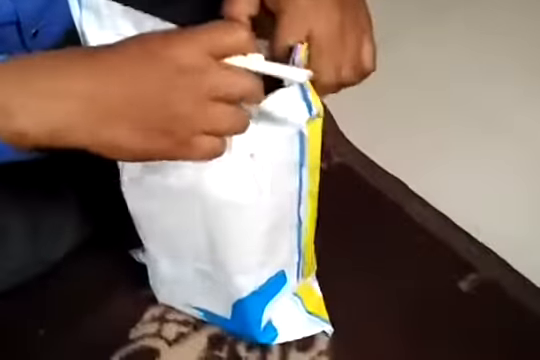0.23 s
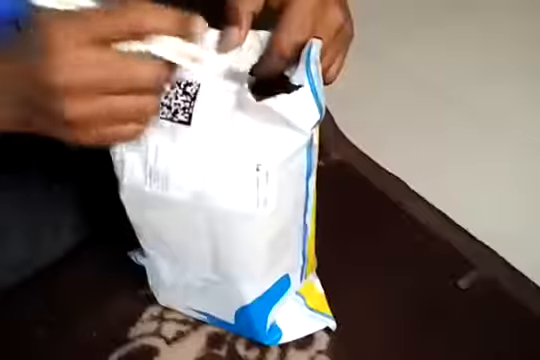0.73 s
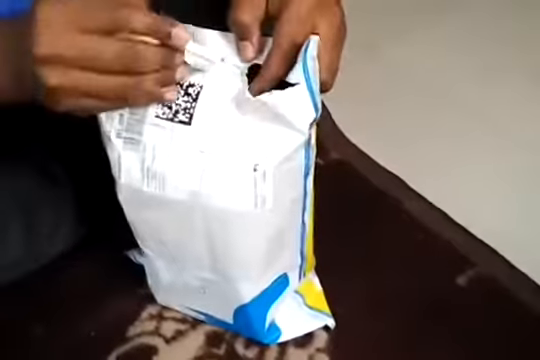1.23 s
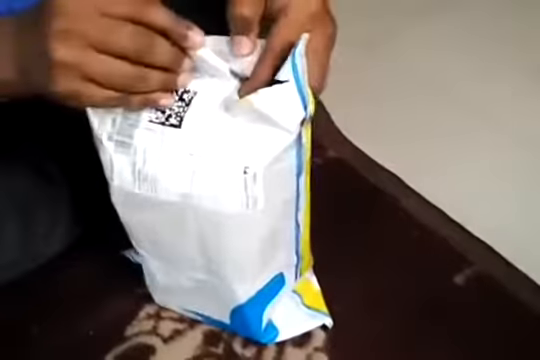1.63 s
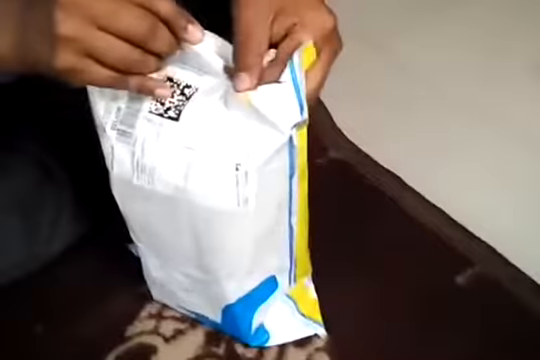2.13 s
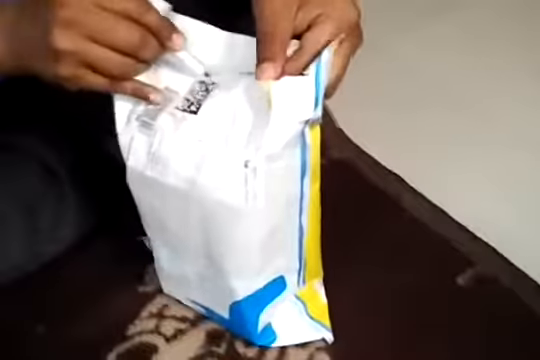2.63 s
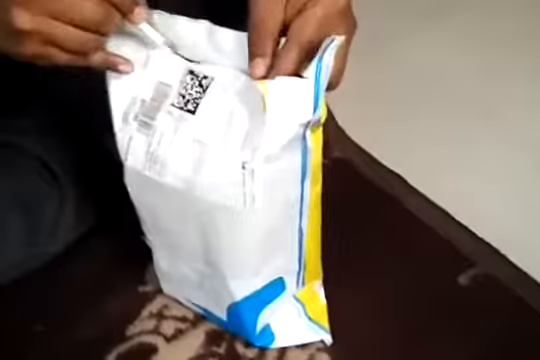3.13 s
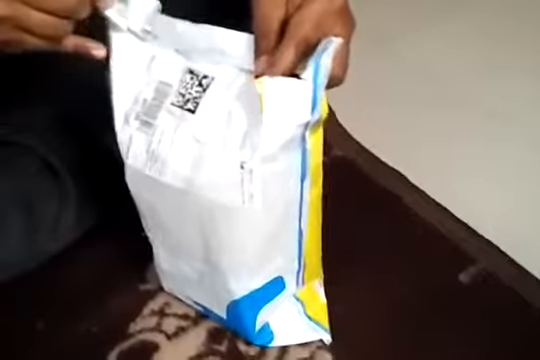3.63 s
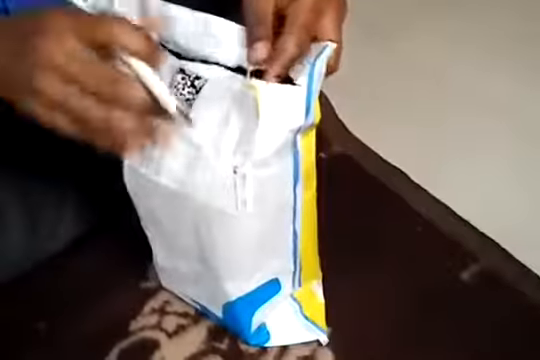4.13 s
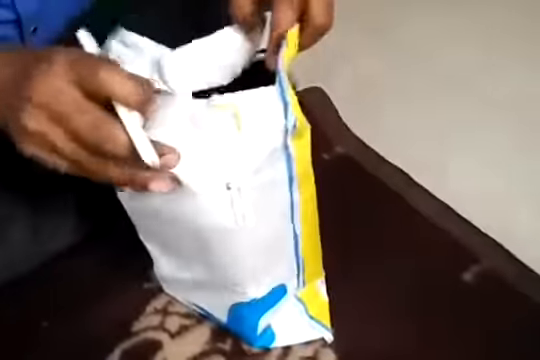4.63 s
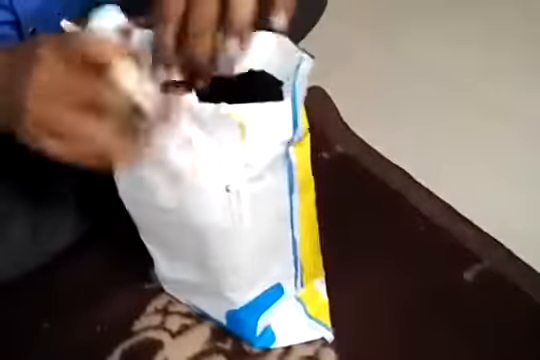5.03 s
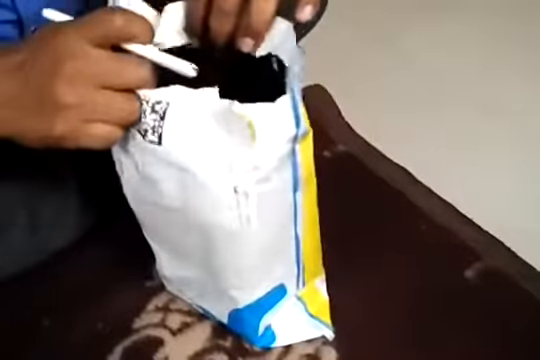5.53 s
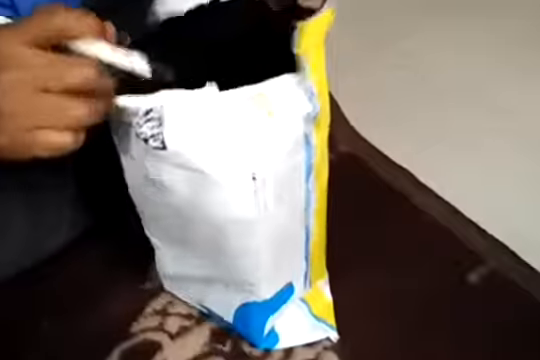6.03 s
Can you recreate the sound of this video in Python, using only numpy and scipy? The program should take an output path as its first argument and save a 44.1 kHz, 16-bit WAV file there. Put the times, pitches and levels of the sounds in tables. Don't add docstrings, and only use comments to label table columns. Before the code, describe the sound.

A crisp, hollow plastic bag is rubbed and torn by hand. Irregular rustle, sharp creases and flat panel pops come in clusters, thin out, then break into one loud crack midway. A harsh scrape of film follows, then more pops and thick crackling before it eases off. Close phone microphone, stereo, small hard-walled room with brief tails and faint air.

```python
import sys
import numpy as np
from scipy import signal
from scipy.fft import rfft, irfft, dct
from scipy.io import wavfile
from scipy.ndimage import uniform_filter1d, map_coordinates

SR = 44100
rng = np.random.default_rng(int(sys.argv[2]) if len(sys.argv) > 2 else 0)


def persist_wave(psi):
    counts = np.round(np.clip(psi, -1, 1) * 32767).astype(np.int16)
    wavfile.write(sys.argv[1], SR, np.atleast_2d(counts).T)


def linear_from_db(decibels):
    return 10 ** (np.asarray(decibels, float) / 20)


N = 276507

# [pitch_hz, level_db per Hz]
AIR = [(15, 0), (25, 6), (49, 13.5), (335, 10.5), (1040, -21), (1790, -35), (2690, -53.5), (3520, -5),
       (8500, -4.5), (14000, -1), (16000, -72)]
AIR_DB = -71

# [hardest_s, rise_s, fall_s, film_db, panels_db relative to the film]
STROKES = [(0.0, .1, 0.55, -53.5, 1.5), (0.308, 0.1, 0.3, -49.5, -1), (0.68, 0.02, 0.14, -56.5, 1),
           (1.018, 0.06, 0.36, -65.5, 5.5), (1.13, 0.27, 0.12, -60.5, -14), (1.59, 0.09, 0.16, -60.5, 4),
           (1.936, 0.04, 0.11, -54, -5.5), (2.17, 0.5, 0.24, -64.5, 3.5), (2.659, 0.06, 0.18, -64, 11.5),
           (3.048, 0.01, 0.1, -48, -4), (3.193, 0.19, -0.0841, -40, -9), (3.48, 0.8, 0.3, -73, 5.5),
           (3.7, -0.41, 0.14, -56, 3), (3.35, 1.2, -0.2, -69, -6), (2.9, 0.4, 0.9, -69, -2),
           (1.75, 0.56, -1.2, -70, -5), (3.93, -0.47, 0.27, -59.5, -2.5), (3.8, -0.65, 0.56, -61.5, -5),
           (4.1, -0.5, 1, -63.5, -19), (4.25, -0.17, 0.1, -63, -3.5), (4.441, -0.07, 0.51, -55, 4.5),
           (4.634, -0.02, 0.12, -44.5, -5), (4.87, -0.5, 0.1, -60.5, -6), (5.06, 0.05, 0.2, -56.5, 0.5),
           (5.31, -0.12, 0.5, -54.5, -3), (5.518, 0.35, 0.53, -54.5, 2), (5.8, -0.4, 1, -58.5, -2),
           (6.031, 0.12, 0.16, -53.5, 5.5), (6.25, 0.1, 3, -61.5, -12)]
STROKE_ROUND = 1.5
# [level_db] for film, panels, hollow
RESTING_DB = [-81, -85, -74.5]
HOLLOW_RE_PANELS_DB, HOLLOW_RE_SHOVE_DB = -7, -8

# [start_s, peak_db, pitch_hz, neighbours_db relative to the peak]
FURTHER_POPS = [(0.061, -39, 2580, -2), (0.122, -41, 372, 7), (0.256, -37.5, 1090, 3), (0.494, -46.5, 1340, 7.5),
                (0.519, -44, 964, 4), (0.692, -47, 990, 9), (1.125, -40.5, 1060, 0), (1.582, -47, 973, 10.5),
                (1.818, -29.5, 2680, -17), (1.835, -38, 2450, -9), (1.903, -46.5, 361, -13), (2.2, -53, 930, 2),
                (0.143, -42, 377, 8.5), (0.142, -41, 2200, 0), (0.216, -49, 1130, -1), (0.271, -36, 2670, -2),
                (0.288, -39.5, 1120, 6.5), (0.327, -36.5, 2590, 2), (0.329, -44, 1270, -1.5),
                (0.345, -43, 1060, 5), (0.388, -43, 970, 1), (3.865, -46.5, 428, 9.5), (3.439, -46, 2490, -10),
                (4.68, -32.5, 2290, -4), (5.308, -52, 302, -5), (5.59, -38, 1090, -2), (5.948, -39, 2020, -14),
                (6.016, -40, 2000, -9), (1.879, -39.5, 2800, 3.5), (1.904, -43, 1383, 3.5), (2.23, -48.5, 916, 11),
                (2.372, -48.5, 385, -17), (2.869, -48.5, 1430, -3), (3.235, -46, 1190, -17),
                (3.45, -40.5, 2240, 1), (3.716, -36.5, 1000, 5.5), (3.752, -38.5, 967, -0.5),
                (3.837, -38, 2590, -0.5), (4.322, -42.5, 968, 3.5), (4.43, -37, 2780, 0), (4.569, -29, 2000, 0),
                (4.607, -32, 954, 6), (5.325, -39, 1450, 7), (5.419, -39.5, 2100, -4), (5.482, -37.5, 665, 3),
                (5.539, -27, 2094, -2.5), (5.851, -42.5, 380, -8), (5.891, -41, 680, 8), (5.926, -37, 1022, 10)]
FURTHER_POP_MS = 6.7
# [start_s, peak_db, pitch_hz, length_ms, neighbours_db relative to the peak]
POPS = [(0.157, -31, 320, 1.9, -12), (0.3, -41, 351, 9.5, -25), (0.35, -30, 3020, 8.7, -12),
        (0.666, -27, 900, 3.46, 5), (1.044, -42.5, 1070, 14.5, 1), (2.134, -53, 336, 16, 10),
        (2.542, -22.5, 1080, 10, 0), (2.54, -20.5, 1430, 11, -10), (2.546, -31.5, 350, 26, -4),
        (2.543, -24, 1960, 15, -12), (2.613, -37.5, 396, 14.6, 7), (2.585, -25, 2200, 19.7, 3),
        (2.673, -40, 1345, 11, -2), (3.466, -40.5, 1905, 8.9, -10), (3.484, -46, 2000, 16, 2.5),
        (3.503, -47, 2230, 6, -10), (3.666, -31, 2000, 9.9, -16), (3.667, -35, 570, 9.1, -11),
        (3.672, -27, 2680, 6.8, -7), (3.666, -29, 1010, 7, -10), (3.05, -41, 1330, 18, -8),
        (3.665, -29.5, 437, 11.6, 3), (3.678, -23, 397, 2.05, 2), (4.453, -32.5, 2130, 15, -1.5),
        (4.466, -32.5, 1150, 4.7, 7), (4.62, -31.5, 304, 2.4, 0), (4.677, -22.5, 3090, 2.2, 2),
        (4.681, -19.5, 2945, 5.3, -9.5), (3.101, -49, 1290, 28, -3), (3.149, -47, 2400, 30, 3),
        (3.2, -44, 1103, 17, 5.5), (4.697, -36, 2990, 10, -3), (5.068, -50, 760, 17, 10.5),
        (5.348, -38, 1115, 7, 2.5), (5.462, -33.5, 1280, 4.2, 8.5), (5.621, -29.5, 2210, 15, 1),
        (5.648, -44.5, 379, 17, 11), (5.683, -40, 1130, 8.2, 8.5), (5.948, -37.5, 996, 55, 3.5),
        (6.015, -28.5, 385, 6.2, 7.5)]
PUMP_HZ, PUMP_DB, PUMP_DB_PER_OCT = 1150, -8, -2.5

# [start_s, peak_db, pitch_hz, length_ms]
SNAPS = [(0.0640, -25, 5100, 3.8), (0.1809, -22, 7400, 5.9), (0.271, -20.5, 6600, 3.6),
         (0.289, -25, 7400, 3.3), (0.6664, -24, 8600, 4.5), (0.6932, -24.5, 6100, 6.2),
         (1.104, -29, 7050, 4.9), (1.9024, -23.5, 6630, 5.9), (2.4715, -31, 7400, 5.3),
         (2.53, -27, 6300, 4.9), (2.543, -12.5, 6960, 6.5), (2.593, -17, 5800, 5.2),
         (3.6656, -23.5, 7240, 9.2), (3.672, -26.5, 9800, 7.4), (4.0802, -36.5, 5860, 12),
         (4.4481, -23.5, 7900, 2.7), (4.547, -33.5, 6460, 15), (4.559, -34, 6900, 17),
         (4.608, -22.5, 4750, 8.3), (4.6771, -21.5, 8560, 6.4), (5.292, -25, 8040, 3.8),
         (5.323, -27.5, 7200, 8.8), (5.4835, -28, 6260, 7.1), (5.615, -26.5, 9700, 14),
         (5.6218, -27, 6750, 4.1), (5.669, -24.5, 8100, 5.4), (5.9, -29, 6400, 5.5),
         (5.927, -21.5, 7200, 6.1), (5.942, -20.5, 8760, 4.8), (5.994, -22, 6300, 6.2),
         (6.0139, -21.5, 7100, 3.6)]
# [start_s, peak_db, pitch_hz]
TICKS = [(0.126, -39, 7530), (0.144, -41, 5700), (0.349, -31, 5360), (0.4852, -35, 4840),
         (1.051, -43, 6560), (1.527, -42.5, 4230), (1.58, -33, 6900), (1.5895, -32, 6200),
         (1.65, -37.5, 7000), (1.789, -38, 8500), (1.819, -34, 5900), (2.1396, -37, 5260),
         (2.2303, -38.5, 6700), (2.8698, -46.5, 5300), (2.931, -43, 6100), (3.019, -33, 7000),
         (3.2351, -31.5, 5940), (3.4577, -34.5, 8600), (3.8655, -35, 5560), (3.92, -37, 6100),
         (4.2891, -41.5, 7750), (4.371, -36.5, 10000), (4.43, -37, 6840), (4.467, -30, 6460),
         (5.0686, -32, 6300), (5.462, -32.5, 5950), (5.5667, -41, 6270), (5.7842, -33, 8900),
         (5.851, -37.5, 6000), (6.1, -36, 5730)]
TICK_HZ, TICK_MS = 7200, 6.77
# [start_s, peak_db, pitch_hz]
CRACKS = [(0.1426, -27, 5560), (0.197, -37, 8000), (0.148, -39, 7000), (0.22, -33, 7000),
          (0.304, -25, 6500), (0.316, -35.5, 7000), (0.359, -30, 6560), (0.392, -43, 6500),
          (3.691, -36, 7500), (3.719, -34, 7000), (4.572, -33, 7500), (4.621, -31, 7000),
          (4.636, -30, 6900), (4.699, -26, 6950), (5.352, -36.5, 6960), (5.648, -35, 7500),
          (5.969, -33, 7000), (5.98, -26, 7500), (0.283, -31, 7000), (0.649, -43, 6400),
          (1.8637, -38, 6500), (2.002, -41, 6400), (2.201, -41, 6500), (2.235, -42, 6500),
          (2.4764, -29, 7400), (2.533, -29, 6000), (2.5388, -21.5, 6500), (2.5427, -21, 8000),
          (2.55, -20, 6300), (2.549, -25, 6000), (2.588, -24.5, 5470), (3.4555, -32.5, 8100),
          (3.4662, -34.5, 7600), (3.4508, -43, 7500), (3.4694, -48, 6000), (3.6635, -41, 7500),
          (3.6747, -25.5, 8150), (3.679, -29, 9000), (4.029, -42, 6500), (4.195, -40, 6470),
          (4.956, -47.5, 6570), (5.057, -44.5, 6460), (5.305, -43, 7500), (5.332, -32, 7500),
          (5.427, -37, 7960), (5.51, -30, 7040), (5.602, -49, 8000), (5.6127, -24, 8000),
          (5.618, -24.5, 7500), (5.6247, -25, 7550), (5.848, -39, 6540), (5.888, -36, 8000),
          (5.904, -27, 8000), (5.9296, -31, 7000), (5.9437, -17.5, 8100), (5.947, -23, 7600),
          (5.956, -31, 8500), (6.017, -24, 7500)]
CRACK_MS = 1.75
# [start_s, peak_db, pitch_hz, length_ms]
SQUEAKS = [
    (2.476, -28.5, 6080, 6),
    (2.532, -40, 6370, 2.8),
    (2.541, -13.5, 6150, 5),
    (4.08, -34.5, 6050, 7.3),
    (0.354, -40, 6000, 3.1),
    (5.994, -34, 5800, 2.4),
]
SQUEAK_WIDTH_HZ = 220
# [start_s, crease_db, panel_db, panel_pitch_hz]
CRINKLES = [(0.998, -58, -51, 440), (1.019, -51, -46, 1000), (1.106, -55, -46, 1025),
            (1.286, -58, -61, 1470), (1.731, -43.5, -47.5, 2110), (1.792, -48, -48, 2280),
            (2.04, -47, -49.5, 1060), (2.405, -56, -64, 2000), (2.528, -48, -41, 2060),
            (2.556, -43, -38, 373), (3.016, -51, -48, 946), (3.34, -61.5, -50.5, 864),
            (3.468, -60, -50, 2000), (3.883, -37.5, -61, 990), (3.945, -41, -45, 1000),
            (4.058, -62, -49.5, 1225), (4.205, -44.5, -56, 496), (4.374, -70, -50.5, 1430),
            (4.408, -49, -47, 1480), (4.887, -64, -45.5, 2700), (4.918, -47, -62, 2000),
            (5.046, -52, -47.5, 1960), (5.085, -42, -39.5, 2490), (5.152, -45, -52, 1040),
            (5.186, -43.5, -46.5, 1006), (5.251, -86, -59, 443), (5.784, -52, -40.5, 2190),
            (6.06, -48, -41, 610), (6.19, -59, -48.5, 426)]
CRINKLE_NEIGHBOURS_DB = -0.5

# [pitch_hz, level_db per Hz]
FILM = [(1500, -29), (2600, -11), (4000, -2), (6200, 0.5), (8000, -1), (11300, -4.5), (14000, -8.5),
        (17000, -6)]
# [pitch_hz, width_hz, level_db]
PANEL = [(1070, 147, -2.5), (1430, 106, -3), (2000, 720, -4.5), (2800, 1275, -5)]
# [pitch_hz, width_hz, level_db]
HOLLOW = [(230, 353, -5.5), (379, 210, 1.5), (465, 27, 2), (687, 330, -5.5)]
SLACK = [.94, 1.0, 1.06]
BANDS = 3

# [pitch_hz, time to fall 60 dB_s, level_db]
WALLS = [(149, 0.12, 0), (540, 0.25, 1), (1437, 0.31, -3.5), (3760, 0.35, 0), (9050, 0.31, -8),
         (15140, 0.1, -4.5)]

# [peak_s, level_db]
SHIFT = [(0.17, -57), (0.3, -64), (0.42, -73), (2.602, -50.5), (3.8, -55.5), (3.92, -63), (3.7, -58),
         (4.47, -60), (4.64, -52.5), (5.95, -56.5), (5.4, -61.5), (5.65, -60), (6.09, -57)]
SHOVE_RISE_S, SHOVE_FALL_S, SHOVE_REST_DB = 0.1, 0.2, -84
# [peak_s, level_db]
THUDS = [(0.21, -65), (0.38, -73), (0.549, -92), (1.33, -78), (1.78, -82.5), (2.38, -81), (2.8, -78),
         (3.45, -83.5), (3.82, -72), (4.52, -84), (5.12, -80), (5.4, -85)]
MODE_HZ, MODE_RISE_S, MODE_FALL_S = 54, 0.098, 0.19

# [pitch_hz, left_minus_right_db]
PORTS = [(110, 2.5), (400, 0.5), (1300, 1), (2700, 3.5), (4000, -2), (5300, 2), (6200, 5.5), (8000, 8.5),
         (10000, 5), (11600, -1), (14200, 3)]
NOTCH_HZ, NOTCH_WIDTH_HZ, NOTCH_DEPTH = 3750, 500, 0.33
# [pitch_hz, level_db relative to its neighbours]
THIN = [(1000, -18), (2000, -8), (3000, -8), (3700, -2), (4700, -4), (6000, -8), (9400, -9), (11000, 0),
        (12500, 2), (14000, 7)]
# [start_s, peak_db]
TOP_FLASHES = [(0.181, -57), (0.2703, -55), (0.6654, -52), (1.1039, -79), (1.7888, -76), (1.9021, -53),
               (2.4713, -68), (2.5292, -56), (3.2355, -67), (3.456, -72), (3.465, -71.5), (3.6641, -68.5),
               (4.4298, -80), (4.4478, -70), (4.6079, -61), (5.2914, -84), (5.4625, -51), (5.621, -70),
               (0.064, -72), (0.143, -69), (5.67, -86), (5.9254, -54), (5.9424, -39), (5.9928, -78)]
TOP_FLASH_MS, TOP_FLASH_DB = 2.0, 3
TOP_HZ, EDGE_HZ = 14350, 16400


def unit(x):
    return x / np.sqrt(np.mean(x ** 2))


def colour(x, points, size=4096):
    hz, db = np.transpose(points)
    grid = np.log(np.arange(size // 2 + 1) * SR / size + 1)
    cep = irfft(np.interp(grid, np.log(hz), db) * np.log(10) / 20)
    cep[1:size // 2] *= 2
    cep[size // 2 + 1:] = 0
    return signal.fftconvolve(x, irfft(np.exp(rfft(cep))))[:len(x)]


def ring(x, hz, width):
    return signal.lfilter(*signal.iirpeak(hz, hz / width, fs=SR), x)


def body(x, modes):
    click = (np.arange(4096) == 0) * 1.0
    shape = 0
    for k, (hz, width, db) in enumerate(modes):
        shape = shape + (-1) ** k * linear_from_db(db) * ring(click, hz, width)
    return signal.fftconvolve(x, shape / np.sqrt(np.sum(shape ** 2)))[:len(x)]


def swell(peak_s, rise_s, fall_s, db, rounded=0.87):
    t = np.arange(N) / SR - peak_s
    away = np.where(t < 0, -t / max(rise_s, .01), t / max(fall_s, .01))
    return linear_from_db(2 * (db - 20 * away ** rounded))


def shoves():
    moves = sum(swell(s, SHOVE_RISE_S, SHOVE_FALL_S, db) for s, db in SHIFT)
    return linear_from_db(2 * SHOVE_REST_DB) + moves


def crackle(per_s, spread_db):
    hit = rng.random((BANDS, N)) < per_s / SR
    size_db = np.minimum(spread_db * rng.exponential(1, (BANDS, N)), 3 * spread_db)
    size = hit * linear_from_db(size_db)
    return np.array([unit(size * rng.standard_normal((BANDS, N))) for _ in range(2)])


def patchy(per_s, db):
    k = int(SR / per_s)
    steps = np.repeat(rng.standard_normal(N // k + 1), k)
    return linear_from_db(db * uniform_filter1d(steps, k // 2)[:N])


def burst(slips, s, ms, rise, tail_s):
    start, length = int(s * SR), ms / 1000
    t = np.arange(min(int((2 * length + tail_s) * SR), N - start)) / SR
    window = np.minimum(t / (rise * length), 1) * np.exp(-(t / length) ** 1.67)
    at = slice(start, start + len(t))
    cut = window * slips[:, at]
    even = np.sqrt(np.sum(window ** 2) / np.sum(cut ** 2, axis=1, keepdims=True))
    return at, cut * even


def air():
    own, shared = rng.standard_normal((2, N)), rng.standard_normal(N)
    low = signal.butter(2, 600., fs=SR)
    mixed = [x + 0.51 * signal.lfilter(*low, shared - x) for x in own]
    return np.array([unit(colour(x, AIR)) for x in mixed]) * linear_from_db(AIR_DB)


def rustle_drive(slips):
    film = panel = 0
    for s, rise_s, fall_s, db, panels_db in STROKES:
        stroke = swell(s, rise_s, fall_s, db, STROKE_ROUND)
        film = film + stroke
        panel = panel + linear_from_db(2 * panels_db) * stroke
    hollow = linear_from_db(2 * HOLLOW_RE_PANELS_DB) * panel + linear_from_db(2 * HOLLOW_RE_SHOVE_DB) * shoves()
    grip = patchy(40, 1.0)
    levels = []
    for power, rest_db in zip((film, panel, hollow), RESTING_DB):
        levels.append(np.sqrt(power + linear_from_db(2 * rest_db)) * grip * patchy(80, 2.78))
    return slips * levels


def pop_drive(slips, cycles=3.9, broad_db=-8, pump_db=-3):
    drive, notes = np.zeros((2, BANDS, N)), np.zeros(N)
    tension = 1 + .09 * unit(uniform_filter1d(rng.standard_normal(N), size=40))
    small = [*FURTHER_POPS, *[(s, db, hz, CRINKLE_NEIGHBOURS_DB) for s, _, db, hz in CRINKLES]]
    events = [*POPS, *[(s, db, hz, FURTHER_POP_MS, mid_db) for s, db, hz, mid_db in small]]
    for s, db, hz, ms, mid_db in events:
        bass_db = mid_db + PUMP_DB + PUMP_DB_PER_OCT * abs(np.log2(hz / PUMP_HZ))
        at, cut = burst(slips[:, 1], s, ms, 0.14, .03)
        drive[:, 1, at] += linear_from_db(db + mid_db + broad_db) * cut
        drive[:, 2, at] += linear_from_db(db + bass_db + pump_db) * cut
        t = np.arange(cut.shape[1]) / SR
        rise = t / (ms / 2000)
        swing = rise * np.exp(1 - rise - (t * hz / (4 * cycles)) ** 2)
        notes[at] += linear_from_db(db) * swing * np.sin(2 * np.pi * hz * np.cumsum(tension[at]) / SR)
    return drive, notes


def snap_drive(slips, ring_share=0.5, ring_width=3720.0, push_db=-16, spark_db=-9, spark_hz=13020.0):
    drive, sparks = np.zeros((2, BANDS, N)), np.zeros((2, N))
    small = [*TICKS, *[(s, db, TICK_HZ) for s, db, *_ in CRINKLES]]
    events = [*SNAPS, *[(*row, TICK_MS) for row in small], *[(*row, CRACK_MS) for row in CRACKS]]
    for s, db, hz, ms in events:
        at, cut = burst(slips[:, 0], s, ms, 0.15, 0.00305)
        ringing = 1.59 * ring_share * ring(cut, hz, ring_width)
        drive[:, 0, at] += linear_from_db(db) * ((1 - ring_share) * cut + ringing)
        drive[:, 1, at] += linear_from_db(db + push_db) * cut
        sparks[:, at] += linear_from_db(db + spark_db + 0.3 * (db + 19)) * cut
    for s, db, hz, ms in SQUEAKS:
        at, cut = burst(slips[:, 0], s, ms, 0.22, .006)
        drive[:, 0, at] += linear_from_db(db + 10.5) * ring(cut, hz, SQUEAK_WIDTH_HZ)
    return drive, ring(ring(sparks, spark_hz, 5000.0), spark_hz, 5000.0)


def panels(drive, stretch):
    share = np.exp(-(stretch - np.array([[-1.2], [0], [1.2]])) ** 2)
    share = share / np.sqrt(np.sum(share ** 2, axis=0))
    sound = 0
    for part, k in zip(share, SLACK):
        sound = sound + body(part * drive, [(hz * k, width * k, db) for hz, width, db in PANEL])
    return sound


def bag():
    slips = crackle(20000, 2.0)
    pops, notes = pop_drive(slips)
    clicks = signal.lfilter([1], [1, -.975], abs(crackle(200, 4.8)))
    ticks = np.minimum(clicks, 30) * slips / 4
    snaps, sparks = snap_drive(slips)
    rustle = rustle_drive(crackle(14000, 3.5) + linear_from_db(-9.0) * ticks)
    drive = linear_from_db(-2) * snaps + pops + rustle
    alike = np.array([.05, .7, .97])[:, None]
    right = alike * drive[0] + np.sqrt(1 - alike ** 2) * drive[1]
    grip = np.repeat(rng.standard_normal(N // 6000 + 1), 6000)
    stretch = unit(uniform_filter1d(grip, 4000)[:N])
    click = (np.arange(4096) == 0) * 1.0
    film_gain = 1 / np.sqrt(np.sum(colour(click, FILM) ** 2))
    sound = []
    for film, panel, hollow in (drive[0], right):
        sound.append(film_gain * colour(film, FILM) + panels(panel, stretch) + body(hollow, HOLLOW))
    small = signal.butter(2, 170., "high", fs=SR)
    return signal.lfilter(*small, sound), signal.lfilter(*small, notes + sparks)


def walls(dry, gap_s=0.00011, alike_hz=1220.0, waver_samples=1.6):
    t = np.arange(int(.7 * SR)) / SR
    onset = np.clip((t - gap_s) / 0.012, 0, 1) ** 0.97
    shared = rng.standard_normal(len(t))
    low = signal.butter(2, alike_hz, fs=SR)
    wet = []
    for x in dry:
        own = rng.standard_normal(len(t))
        noise = own + signal.lfilter(*low, shared - own)
        tail = 0
        for hz, t60, db in WALLS:
            tail = tail + linear_from_db(db - 60 * t / t60) * ring(noise, hz, 0.69 * hz) / np.sqrt(t60 * SR / 14)
        echo = rfft(onset * tail)
        power = abs(echo) ** 2
        even = np.sqrt(uniform_filter1d(power, size=300) / uniform_filter1d(power, size=24))
        wet.append(signal.fftconvolve(x, irfft(echo * even, len(t)) * (onset > 0))[:N])
    waver = unit(uniform_filter1d(uniform_filter1d(rng.standard_normal(N), size=150), size=150))
    places = np.arange(N) + waver_samples * waver
    return np.array([map_coordinates(x, [places], mode="mirror") for x in wet])


def shift():
    rumble = ring(ring(ring(rng.standard_normal(N), 75.0, 90.0), 130.0, 130.0), 78.6, 190.0)
    return unit(rumble) * np.sqrt(shoves()) * linear_from_db(-7.0)


def room_mode():
    t = np.arange(N) / SR
    waver = unit(uniform_filter1d(uniform_filter1d(rng.standard_normal(N), size=4000), size=4000))
    power = sum(swell(s, MODE_RISE_S, MODE_FALL_S, db, STROKE_ROUND) for s, db in THUDS)
    return np.sqrt(2 * power) * np.sin(2 * np.pi * MODE_HZ * t + waver)


def scene():
    film, notes = bag()
    left, right = film + notes
    shade = [(500, -1.5), (2000, -1.0), (6000, -7.5), (14000, -8.5)]  # (Hz, dB)
    direct = np.array([left, np.roll(colour(right, shade), shift=3)])
    echoes = walls(film + linear_from_db(-7) * notes)
    return direct + echoes + shift() + air() + room_mode()


def thin_out(x, steady, hop=1024, start=139):
    window = np.sin(np.pi * (np.arange(2 * hop) + .5) / (2 * hop))
    where = start + hop * np.arange((N - start) // hop - 1)[:, None] + np.arange(2 * hop)
    a, b, c, d = np.split(x[:, where] * window, 4, axis=2)
    folded = np.concatenate([-c[..., ::-1] - d, a - b[..., ::-1]], axis=2)
    lines = dct(folded, type=4, norm="ortho")
    hz, db = np.transpose(THIN)
    patches = uniform_filter1d(rng.standard_normal((len(where), hop // 16)), 3, axis=0)
    patches_db = 10 * np.repeat(patches, 16, axis=1)
    step_db = np.interp(np.arange(hop) * SR / 2 / hop, hz, db) + patches_db
    weak = lines ** 2 < uniform_filter1d(lines ** 2, size=96) * linear_from_db(2 * step_db)
    dropped = lines * weak * steady[where].all(axis=1)[:, None]
    u, v = np.split(dct(dropped, type=4, norm="ortho"), 2, axis=2)
    lost = window * np.concatenate([v, -v[..., ::-1], -u[..., ::-1], -u], axis=2)
    out = x.copy()
    for half in (slice(0, hop), slice(hop, 2 * hop)):
        out[:, where[:, half]] -= lost[:, :, half]
    return out


def cut_above(x, hz):
    return signal.sosfiltfilt(signal.ellip(10, .1, 80, hz, fs=SR, output="sos"), x)


def low_pass(x):
    return signal.sosfilt(signal.butter(12, 16900, fs=SR, output="sos"), x)


def record(dry):
    left = colour(dry[0], [(hz, db / 2) for hz, db in PORTS])
    right = colour(dry[1], [(hz, -db / 2) for hz, db in PORTS])
    x = np.array([left, right])
    x = x - NOTCH_DEPTH * ring(x, NOTCH_HZ, NOTCH_WIDTH_HZ)
    low = cut_above(x, TOP_HZ)
    top = cut_above(x, EDGE_HZ) - low
    power = np.sum(top ** 2, axis=0)
    earlier = np.roll(uniform_filter1d(power, size=512), shift=400)
    sudden = uniform_filter1d(power, size=128) > 45 * earlier
    t = np.arange(N) / SR
    sudden = sudden | (abs(t - np.array(TOP_FLASHES)[:, :1]).min(axis=0) < .003)
    level = np.sqrt(uniform_filter1d(power, size=256)) + 1e-6
    gate = 0
    for s, db in TOP_FLASHES:
        gate = gate + linear_from_db(db + TOP_FLASH_DB) * np.exp(-((t - s) * 1000 / TOP_FLASH_MS - 1) ** 2)
    return low_pass(thin_out(low, ~sudden) + gate / level * top)


dry = scene()
out = record(dry)
persist_wave(out)
```